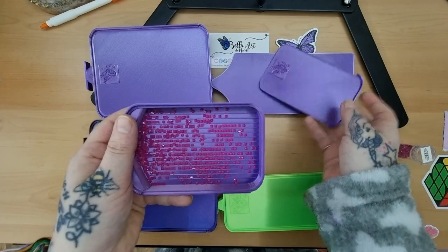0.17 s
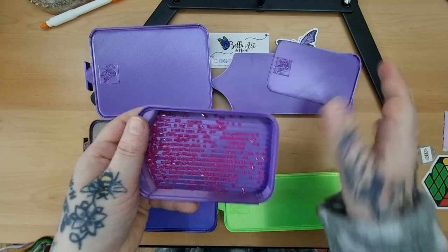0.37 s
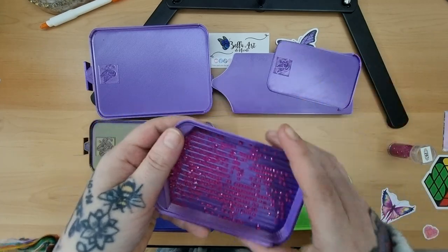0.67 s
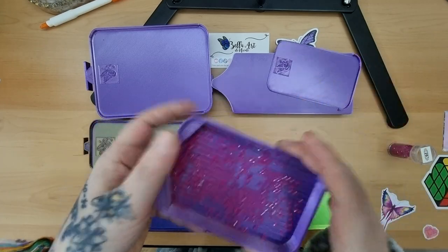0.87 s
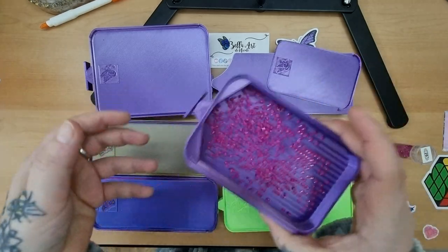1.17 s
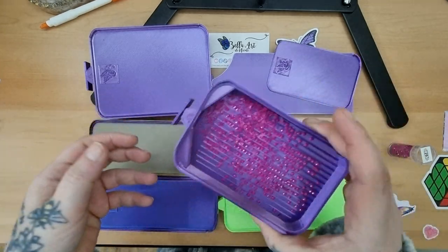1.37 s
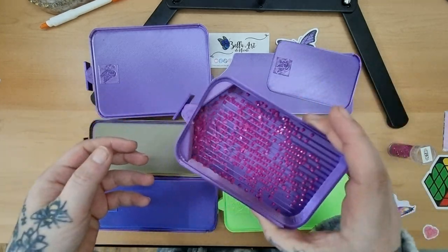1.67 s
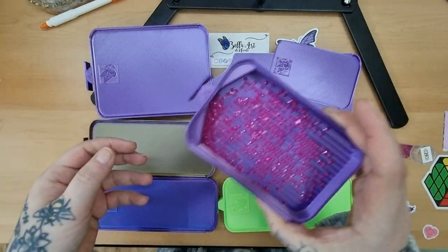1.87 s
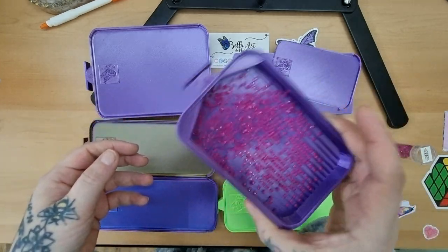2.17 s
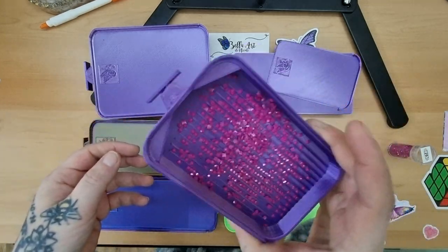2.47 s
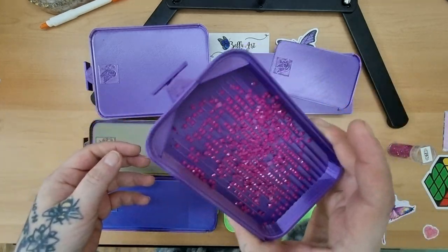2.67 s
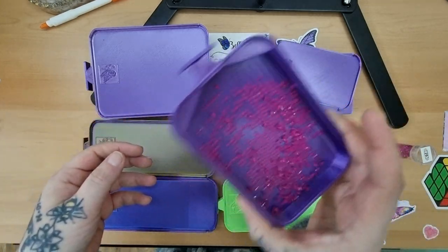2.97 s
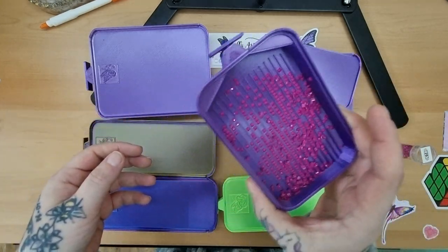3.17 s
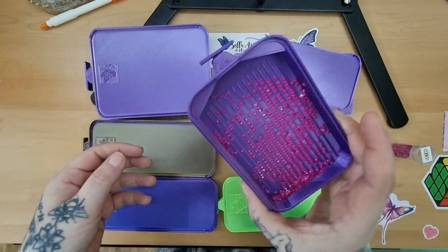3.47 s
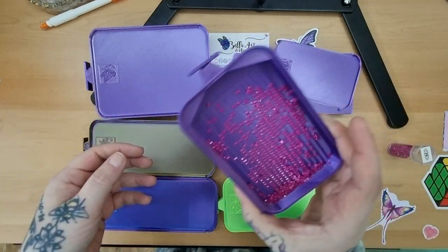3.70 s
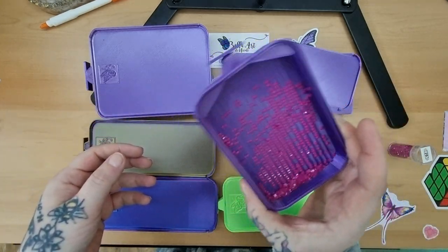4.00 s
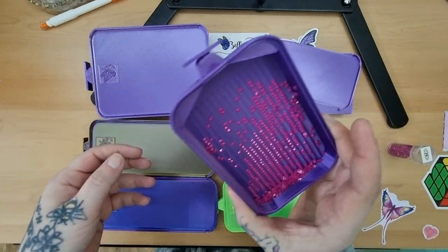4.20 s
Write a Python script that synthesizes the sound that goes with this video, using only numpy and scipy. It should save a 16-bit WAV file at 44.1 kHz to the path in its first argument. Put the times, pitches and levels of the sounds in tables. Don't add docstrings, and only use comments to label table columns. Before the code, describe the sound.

Close, dry stereo sound over faint room air: a plastic lid bounces on a desk with hollow knocks, one sharp clack and low thuds. A short pause, a hand catches a tray with a dull knock, then small resin gems swish and tick over its ridged floor in repeated bursts, strongest midway, softer and more scattered near the end.

```python
import sys
import numpy as np
from scipy import signal
from scipy.fft import rfft, irfft, next_fast_len
from scipy.io import wavfile
from scipy.ndimage import uniform_filter1d, map_coordinates

SR = 44100
rng = np.random.default_rng(int(sys.argv[2]) if len(sys.argv) > 2 else 0)


def transcribe(signal):
    frames = np.atleast_2d(signal).T
    limited = np.clip(frames, -1, 1)
    pcm = np.round(limited * 32767).astype(np.int16)
    wavfile.write(sys.argv[1], SR, pcm)


def gain_from_decibels(decibels):
    exponent = np.asarray(decibels, float) / 20
    return 10 ** exponent


N = 191495

# start_s, tick_level_db, slide_length_s, floor_weight_db
WRIST_STROKES = [(0.975, -58, 0.04, 5), (1.004, -52, 0.055, -7), (1.067, -40.5, 0.141, 2),
                 (1.246, -39.5, 0.054, 0.5), (1.401, -40.5, 0.073, 1.0), (1.54, -40, 0.133, 0),
                 (1.665, -44.1, 0.099, -2.5), (1.937, -47.5, 0.042, -2.5), (2.012, -45, 0.079, -1.5),
                 (2.122, -38.5, 0.062, -1.5), (2.304, -40.5, 0.038, 1.5), (2.481, -46, 0.091, 1.0),
                 (2.622, -43, 0.072, 0.5), (2.766, -43.5, 0.022, 2), (2.93, -41.5, 0.066, 0.5),
                 (3.031, -46.5, 0.117, 2.0), (3.248, -49.5, 0.103, 1.5), (3.366, -49, 0.151, 2),
                 (3.563, -47.5, 0.022, -0.5), (3.627, -51.5, 0.101, -1), (3.673, -52, 0.12, 2.5),
                 (3.801, -51.5, 0.074, 1.5), (3.915, -54, 0.157, 0.5), (4.082, -51.5, 0.072, -1),
                 (4.202, -56.5, 0.072, 5)]
STROKE_RISE_S, STROKE_FALL_DB_PER_S = 0.022, 88
FULL_SHAKING_DB = -42
# start_s, peak_db, left_right_db
STRAY_GEMS = [(3.3188, -37, 0.0), (3.4181, -36, -1.5), (3.4325, -36, -1.0), (3.4739, -34, 0.5),
              (3.5453, -37, -1.0), (3.5782, -38, -1.0), (3.6445, -39, -1.0), (3.6835, -37, -1.0),
              (3.7094, -37, -1.0), (3.7817, -36, 0.0), (3.8216, -36, 0.0), (3.8266, -36, -1.5),
              (3.8715, -37, -1.0), (4.0122, -39, 0.0), (4.0541, -38, -0.5), (4.0975, -40, -1.0),
              (4.1215, -41, -1.0), (4.125, -39, -2.0), (4.1793, -37, -0.5), (4.2716, -40, -0.5),
              (4.314, -39, 4.0), (4.3195, -39, 0.5)]
# frequency_hz, gain_db
TICK_COLOUR_LEFT = [(300, -40), (1000, -15.5), (2100, -16.5), (3600, -13), (4500, -13.5), (5500, -6.5),
                    (6800, -6.5), (7500, -1), (9000, -12), (10300, -11.5), (11500, -10), (13000, -11),
                    (14500, -25), (15600, -9.5)]
# frequency_hz, gain_db
TICK_COLOUR_RIGHT = [(300, -40), (1000, -17), (2200, -14.5), (3800, -5), (4800, -4.5), (5800, -4),
                     (7000, -4.5), (7900, -2.5), (9000, -4), (10800, -12.5), (12200, -7), (13200, -6.5),
                     (14500, -7), (15600, -8.5)]
# pitch_hz, width_hz, level_db
FLOOR_MODES_LEFT = [(894, 207, -8.5), (1154, 150, -12.5), (1636, 144, 4.5), (2430, 160, -5.5),
                    (2950, 340, -4.5), (4200, 280, -20.5)]
# pitch_hz, width_hz, level_db
FLOOR_MODES_RIGHT = [(920, 130, -8.5), (1535, 100, 1), (1752, 350, 1.5), (2420, 78, -7.5), (2770, 480, -9)]
# start_s, level_db, length_s
GRIP_SHIFTS = [
    (3.8, -69, 0.18),
]

# start_s, low_body_db, then relative to it high_body_db and crack_db,
# and left_right_db
LID_CONTACTS = [
    (0.104, -41.5, 6.5, -4, 3),
    (0.109, -32, -1, -9, 3),
    (0.116, -31, -0.5, -21, 4),
    (0.126, -34, -1, -17, -12),
    (0.154, -45, 8, 9, 1.5),
    (0.159, -30, 4, 8.5, -2),
    (0.21, -30, -2.5, -2, -2),
    (0.235, -32.5, -9, -10, 2),
    (0.257, -37.5, -7.5, -29, -1),
]
LID_SETTLING = [
    (0.342, -29.5, -5.5, -7, -4),
    (0.361, -32.5, -9, -10, 4),
    (0.369, -41, -12, -16, -4),
    (0.388, -28.5, -3, -10, -1.5),
    (0.406, -27.5, 3, 4, -1.5),
    (0.412, -30.5, -0.5, -22, 1),
]
HAND_CATCHES = [
    (0.724, -31.5, 1.5, -3.5, 1.7),
    (2.247, -37, -2, -2, 1.1),
    (2.531, -41, -1.5, -25, 1.6),
    (2.947, -58.5, 3, -17, 2),
]
LIGHT_TRAY_SOUNDS = [
    (0.615, -63, -15, 9, -2),
    (0.672, -63, -8, -18, 6),
    (0.713, -51, -12, -10, 0),
    (.775, -35.5, -12, -12, -2),
    (0.851, -49, -0.5, 0.5, 1),
    (4.184, -70, -12, -14, 0),
]
# delay_s, level_db
FINGER_LANDINGS = [
    (0, -3),
    (.008, 2),
    (.02, -0.5),
    (.031, -7.5),
]
# pitch_hz, width_hz, level_db
LID_LOW_MODES = [(269, 36, 4.5), (350, 29, 1), (442, 43, -1), (538, 20, 3.5), (615, 100, -9), (716, 96, -4)]
# pitch_hz, width_hz, level_db
FLAT_LID_LOW_MODES = [(274, 35, -5), (344, 27, -4), (437, 58, -3), (530, 130, -6.5), (664, 130, -8)]
# pitch_hz, width_hz, level_db
LID_HIGH_MODES = [(890, 440, -5.5), (1215, 186, 2.5), (1317, 124, 2), (1690, 146, 0), (2120, 950, -5.5),
                  (2700, 1120, -5), (3170, 610, -7.5)]
# pitch_hz, width_hz, level_db
TRAY_LOW_MODES = [(280, 31, 0.5), (335, 37, 2.5), (397, 160, -10.5), (560, 184, -12), (810, 64, 0.5)]
# pitch_hz, width_hz, level_db
TRAY_HIGH_MODES = [(1075, 33, -0.5), (1370, 45, 7), (1670, 500, -13), (1720, 280, -3.5), (2320, 490, -10),
                   (2610, 210, -6), (3230, 260, -5.5)]
# frequency_hz, gain_db
CRACK_COLOUR = [(1500, -37), (3000, 1), (5500, 1), (8000, -3.5), (10000, -9.5), (13000, -16), (16000, -16)]
# frequency_hz, gain_db
JOLT_COLOUR = [(2000, -1), (3500, -2.5), (6000, -1), (8500, -7.5), (11000, -13), (16000, -15)]

# start_s, body_db, length_s, hiss_over_body_db
RUB_MOVES = [
    (-.05, -58, 0.54, -13.5),
    (0.106, -53, 0.11, -7),
    (0.358, -46.5, 0.049, -11),
    (0.436, -68, 0.12, -10),
    (0.59, -70.5, 0.16, -2.5),
    (0.74, -52, 0.066, -12),
    (0.83, -65.5, 0.029, 1),
    (0.902, -75, 0.064, 0.5),
]
RUB_RISE_S, RUB_FALL_DB_PER_S = 0.0067, 204
# frequency_hz, gain_db
RUB_BODY_COLOUR = [(200, -8.5), (350, -3.5), (650, -3.5), (900, -10), (1300, -10), (1480, -8), (1600, 0),
                   (1750, -12), (2100, -5.5), (2600, -11), (3100, -9), (4000, -22), (5000, -43)]
# frequency_hz, gain_db
RUB_HISS_COLOUR = [(3000, -17), (4000, -4.5), (4600, -9.5), (5000, -5), (5400, -9), (5800, -15),
                   (6600, -9.5), (8000, -14.5), (9500, -31.5), (15500, -25.5)]

# start_s, low_mode_db, upper_mode_db
DESK_PUSHES = [(0.114, -28.5, -41), (0.124, -32, -36.5), (0.247, -50, -51), (0.388, -61, -70),
               (0.409, -38.5, -44), (0.43, -50, -43.5), (0.735, -32, -50.5), (0.876, -52, -69),
               (2.254, -45, -66), (2.54, -78, -56), (2.969, -61, -71)]
# pitch_hz, width_hz, level_db (the pushes set the level instead)
DESK_TOP_MODES = [(86, 28.6, -0.5), (174, 9.1, 2)]
# frequency_hz, decay_60db_s
ROOM_DECAY = [(100, 0.34), (300, 0.44), (800, 0.18), (2000, 0.15), (8000, 0.11), (16000, 0.15)]
# frequency_hz, likeness (0 to 1)
ROOM_LIKENESS = [(100, 0.78), (400, 0), (1500, 0.68), (4000, 0.11)]
# frequency_hz, gain_db
AIR_COLOUR = [(20, -20), (40, 3.5), (90, 0.5), (125, -3.5), (210, -10), (330, 3.5), (800, 0.5), (2000, 4.5),
              (3500, -3.5), (5500, -26), (7000, -17), (9500, -5), (15500, -23)]


def unit(x):
    return x / np.sqrt(np.mean(x ** 2) + 1e-20)


def along(points, hz):
    f, v = np.transpose(points)
    return np.interp(np.log(hz + 1), np.log(f + 1), v)


def wobble(rate):
    knots = rng.standard_normal(int(N * rate / SR) + 4)
    return map_coordinates(knots, [np.arange(N) * rate / SR])


def filtered(x, response):
    m = next_fast_len(N + SR // 2)
    h = response(np.fft.rfftfreq(m, 1 / SR))
    gain = unit(np.abs(h))
    return irfft(rfft(x, m) * gain * np.exp(1j * np.angle(h)), m)[..., :N]


def modes(table):
    def response(f):
        total = 0
        for k, (centre, width, db) in enumerate(table):
            resonance = 1j * f * width / (centre * centre - f * f + 1j * f * width)
            total = total + (-1) ** k * gain_from_decibels(db) * resonance
        return total
    return response


def colour(points):
    return lambda f: gain_from_decibels(along(points, f))


def correlate(a, b, alike):
    turn = np.arccos(np.clip(alike, -1, 1)) / 2
    return np.array([np.cos(turn) * a + np.sin(turn) * b, np.cos(turn) * a - np.sin(turn) * b])


def pair(alike, size=N):
    a, b = rng.standard_normal((2, size))
    return correlate(a, b, alike)


def strokes(rows, rise, fall_db):
    s, db, length = np.transpose(rows)[:, :, None]
    t = np.arange(0, N + 64, 64) / SR
    since = np.maximum(t - s, 0)
    fade = gain_from_decibels(db - fall_db * np.maximum(since - length, 0))
    power = ((1 - np.exp(-since / rise)) * fade) ** 2
    return np.interp(np.arange(N) / SR, t, 10 * np.log10(power.sum(0) + 1e-12))


def shower(tick_db, count, crowding, spread_db, spacing):
    rate = gain_from_decibels(crowding * tick_db) * (tick_db > -100)
    when, sign, tail, where = rng.random((count, 4)).T
    at = np.searchsorted(np.cumsum(rate) / rate.sum(), when).clip(0, N - 1)
    luck = np.sign(sign - 0.5) * unit(gain_from_decibels(-spread_db * np.log(tail + 4e-3)))
    size = luck * gain_from_decibels(tick_db[at]) / np.sqrt(count * rate[at] / rate.sum())
    delay = np.round(spacing * (2 * where - 0.8)).astype(int)
    return np.array([at, at + delay]), np.array([size, size])


def ticks(at, size, life, ring):
    blow = np.array([np.bincount(np.clip(at[k], 0, N - 1), size[k], N) for k in range(2)])
    fade = gain_from_decibels(-60 * np.arange(300) / SR / life) ** 2
    power = signal.fftconvolve(blow ** 2, fade[None] / fade.sum(), axes=1)[:, :N]
    return blow + ring * np.sqrt(np.abs(power)) * pair(0)


def stray_gems():
    s, db, pan_db = np.transpose(STRAY_GEMS)
    at = np.round(s * SR).astype(int)
    size = gain_from_decibels(db - 1.5 + np.array([pan_db, -pan_db]) / 2)
    return ticks(np.array([at, at + 6]), size, life=0.009, ring=4)


def impacts(count, spread_db, lag, scatter):
    when, sign, tail, where = rng.random((count, 4)).T
    size = np.sign(sign - 0.5) * gain_from_decibels(-spread_db * np.log(tail + 1e-4))
    at = (when * N).astype(int)
    delay = np.round(lag + scatter * (2 * where - 1)).astype(int)
    later = np.clip(at + delay, 0, N - 1)
    return unit(np.array([np.bincount(at, size, N), np.bincount(later, size, N)]))


def tray_floor(clumps, single):
    s, db, length, weight_db = np.transpose(WRIST_STROKES)
    late_s = 0.0025
    rows = np.transpose([s + late_s, db + weight_db, length])
    level_db = -10.5 + strokes(rows, STROKE_RISE_S, STROKE_FALL_DB_PER_S)
    pushes = impacts(count=9000, spread_db=1.5, lag=8.5, scatter=1.4) + 0.72 * pair(0.7)
    ragged_db = 1.4 * wobble(39.93)
    pushes = pushes * gain_from_decibels(level_db + clumps + ragged_db) + gain_from_decibels(-14.0) * single
    sides = []
    for push, table, side_db in zip(pushes, (FLOOR_MODES_LEFT, FLOOR_MODES_RIGHT), (3.5, -0.6)):
        resonance = modes(table)
        sides.append(gain_from_decibels(side_db) * filtered(push, lambda f: resonance(f) * f / (f + 600)))
    return np.array(sides)


def tray_drum(tick_db):
    effort = uniform_filter1d(gain_from_decibels(tick_db - FULL_SHAKING_DB), round(0.43 * SR))
    drive = gain_from_decibels(-71.5) * effort + gain_from_decibels(strokes(GRIP_SHIFTS, rise=0.09, fall_db=26))
    skin = modes([(326, 160, 0.97), (424, 350, -3.1)])
    return drive * gain_from_decibels(0.53 * wobble(6.84)) * filtered(pair(0.22), lambda f: skin(f) ** 2)


def gems():
    s, db, length, _ = np.transpose(WRIST_STROKES)
    tick_db = strokes(np.transpose([s, db, length]), STROKE_RISE_S, STROKE_FALL_DB_PER_S)
    tremor_db = 0.5 + 0.05 * np.clip(FULL_SHAKING_DB - tick_db, 0, 12)
    clumps = tremor_db * wobble(45) + 0.5 * wobble(70)
    at, size = shower(tick_db, count=45000, crowding=0.9, spread_db=2.3, spacing=25)
    hits = gain_from_decibels(clumps - 5.5) * ticks(at, size, life=0.003, ring=3.05)
    single = stray_gems()
    left, right = hits + single
    bright = np.array([filtered(left, colour(TICK_COLOUR_LEFT)), filtered(right, colour(TICK_COLOUR_RIGHT))])
    return bright + tray_floor(clumps, single) + tray_drum(tick_db)


def knocks(contacts, low, high, edge, life, alike, lag, rise):
    t = np.arange(SR // 4) / SR
    soft, hard, crack = np.zeros((3, 2, N + len(t)))
    for s, db, high_db, crack_db, pan_db in contacts:
        start = round(s * SR)
        at = slice(start, start + len(t))
        gain = gain_from_decibels(db + np.array([[pan_db], [-pan_db]]) / 2) * (1 - np.exp(-t / rise))
        soft[:, at] += gain * gain_from_decibels(-60 * t / life) * pair(alike, size=len(t))
        hard[:, at] += gain * gain_from_decibels(high_db - 60 * t / (1.46 * life)) * pair(alike, size=len(t))
        crack[:, at] += gain * gain_from_decibels(crack_db - 60 * t / (0.84 * life)) * pair(0.062, size=len(t))
    body = filtered(soft[:, :N], modes(low)) + filtered(hard[:, :N], modes(high))
    left, right = body + filtered(crack[:, :N], colour(edge))
    return np.array([left, np.roll(right, lag)])


def lid_knocks():
    landing = knocks(LID_CONTACTS, LID_LOW_MODES, LID_HIGH_MODES, CRACK_COLOUR,
                     life=0.025, alike=0.34, lag=13, rise=0.00061)
    settling = knocks(LID_SETTLING, FLAT_LID_LOW_MODES, LID_HIGH_MODES, CRACK_COLOUR,
                      life=0.036, alike=0.97, lag=12, rise=0.0023)
    return landing + settling


def hand_knocks():
    catches = [(s + late, db + less_db, *rest)
               for s, db, *rest in HAND_CATCHES for late, less_db in FINGER_LANDINGS]
    return knocks([*catches, *LIGHT_TRAY_SOUNDS], TRAY_LOW_MODES, TRAY_HIGH_MODES, JOLT_COLOUR,
                  life=0.053, alike=0.67, lag=17, rise=0.0012)


def rubbing():
    s, db, length, over_db = np.transpose(RUB_MOVES)
    body_db = strokes(np.transpose([s, db, length]), RUB_RISE_S, RUB_FALL_DB_PER_S)
    hiss_db = strokes(np.transpose([s, db + over_db, length]), RUB_RISE_S, RUB_FALL_DB_PER_S)
    grain = 1.6 * wobble(45)
    body = gain_from_decibels(body_db + 1.5 + grain) * filtered(pair(0.067), colour(RUB_BODY_COLOUR))
    hiss = gain_from_decibels(hiss_db + 5 + grain) * filtered(pair(0.06), colour(RUB_HISS_COLOUR))
    return body + hiss


def desk():
    t = np.arange(SR // 3) / SR
    top = np.zeros(N + len(t))
    onset = 1 - np.exp(-t / 0.012)
    for s, *strengths in DESK_PUSHES:
        start = round(s * SR)
        for db, (hz, width, _) in zip(strengths, DESK_TOP_MODES):
            decay = np.exp(-np.pi * width * t)
            top[start:start + len(t)] += gain_from_decibels(db) * decay * onset * np.sin(2 * np.pi * hz * t)
    return top[:N] * gain_from_decibels([[-0.7], [0.7]])


def room(x):
    hz, t, (a, b) = signal.stft(rng.standard_normal((2, SR // 2)), SR, nperseg=256)
    z = correlate(a, b, along(ROOM_LIKENESS, hz)[:, None])
    decay = gain_from_decibels(-60 * t / along(ROOM_DECAY, hz)[:, None])
    tail = signal.istft(z * decay, SR, nperseg=256)[1]
    late = np.pad(x, ((0, 0), (130, 0)))
    return signal.fftconvolve(late, tail / np.linalg.norm(tail[0]), axes=1)[:, :N]


def air():
    return gain_from_decibels(-69.5) * filtered(pair(0.043), colour(AIR_COLOUR))


def scene():
    rattle = gems()
    hits = lid_knocks() + hand_knocks()
    reverberation = room(gain_from_decibels(-7.5) * hits + gain_from_decibels(-10.5) * rattle)
    return rattle + hits + rubbing() + desk() + reverberation + air()


def band_limit(x):
    return signal.sosfilt(signal.butter(12, 16940, fs=SR, output="sos"), x)


def record(dry):
    hz = np.fft.rfftfreq(N, 1 / SR)
    bass = hz / np.hypot(hz, 35)
    treble = np.where(hz < 15800, 1, gain_from_decibels(-48))
    mix = irfft(rfft(dry) * bass * treble, N)
    return band_limit(mix)


dry = scene()
out = record(dry)
transcribe(out)
```